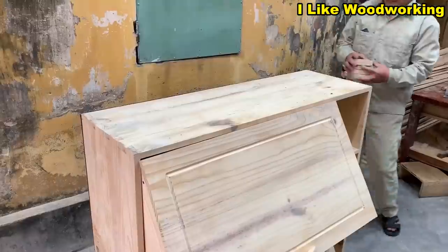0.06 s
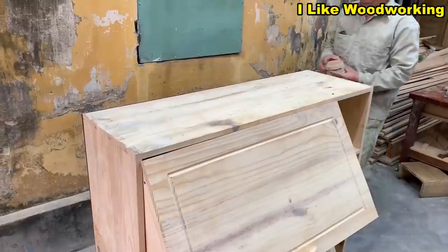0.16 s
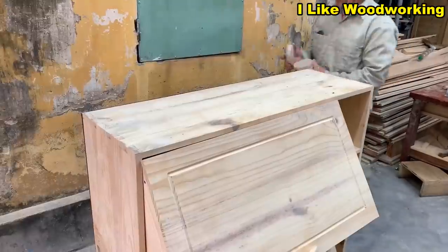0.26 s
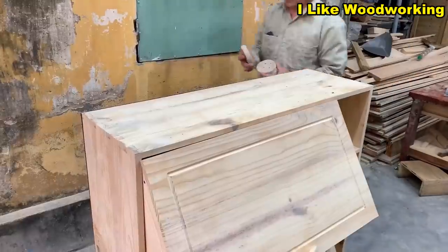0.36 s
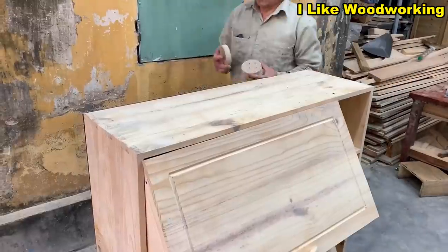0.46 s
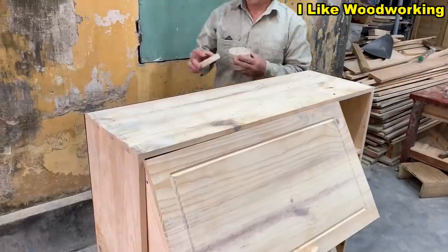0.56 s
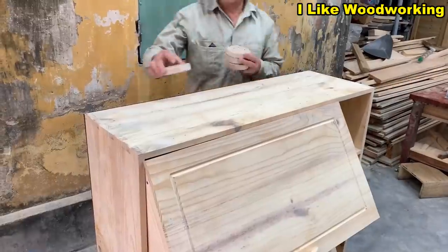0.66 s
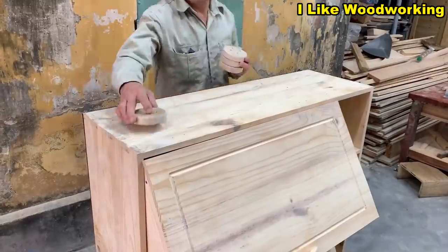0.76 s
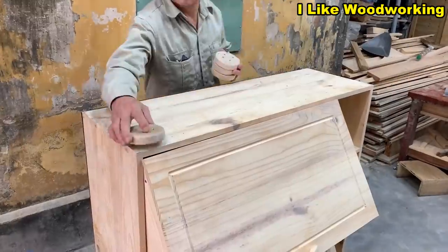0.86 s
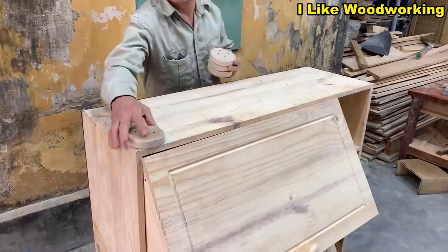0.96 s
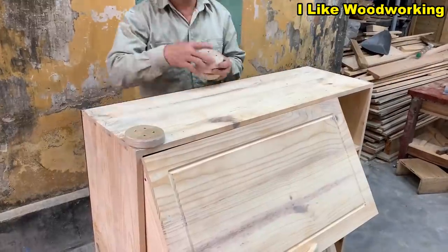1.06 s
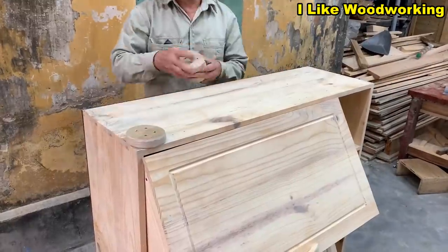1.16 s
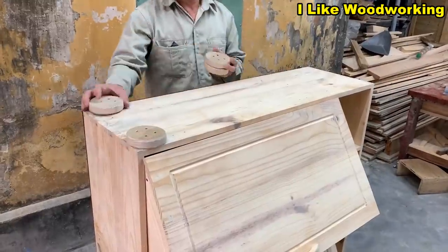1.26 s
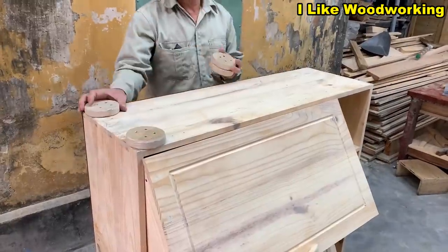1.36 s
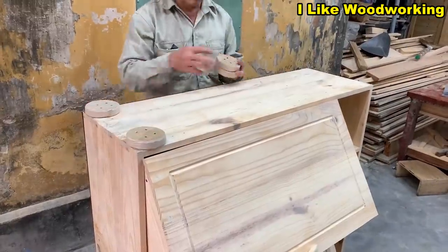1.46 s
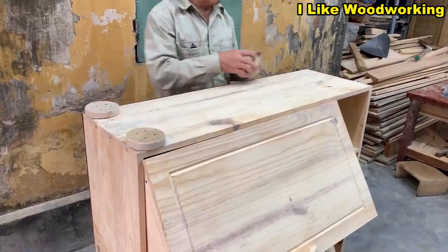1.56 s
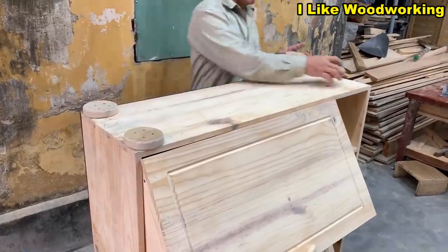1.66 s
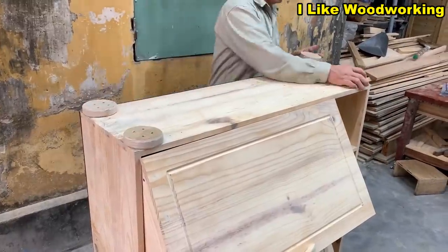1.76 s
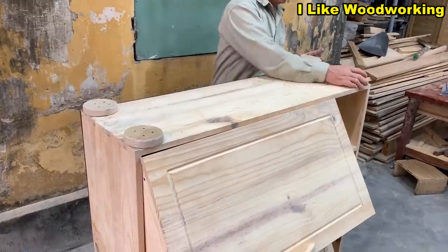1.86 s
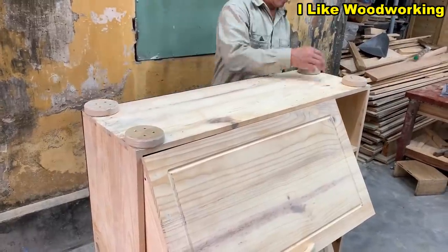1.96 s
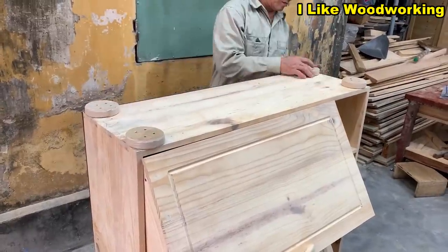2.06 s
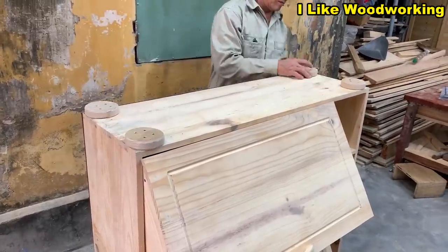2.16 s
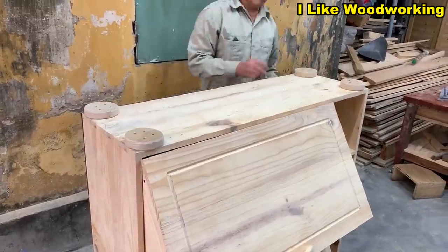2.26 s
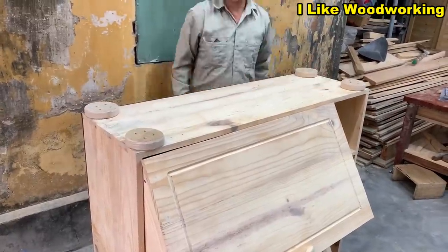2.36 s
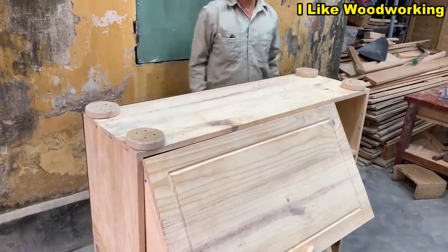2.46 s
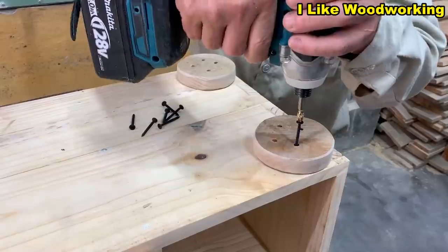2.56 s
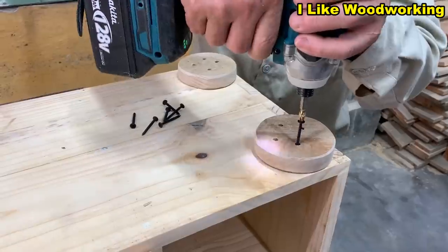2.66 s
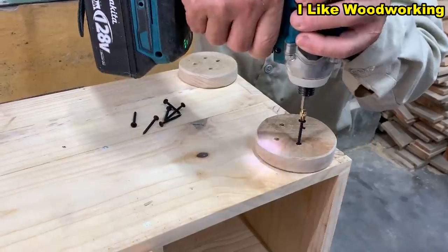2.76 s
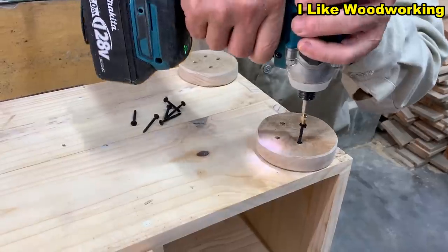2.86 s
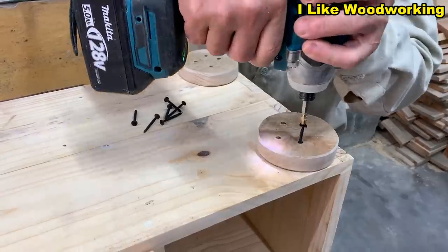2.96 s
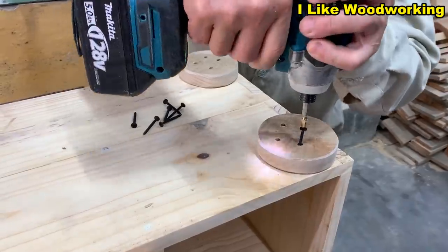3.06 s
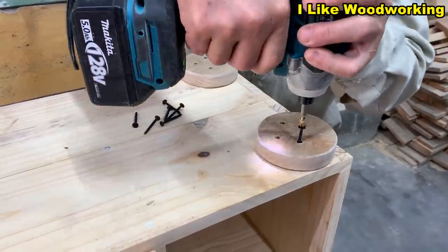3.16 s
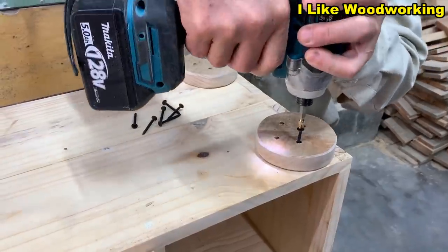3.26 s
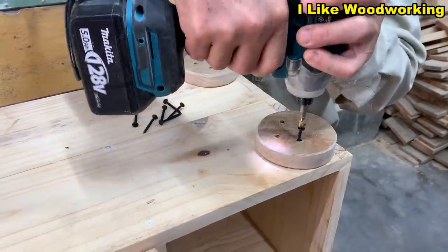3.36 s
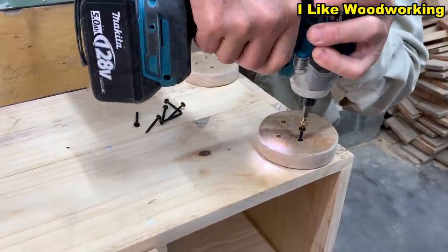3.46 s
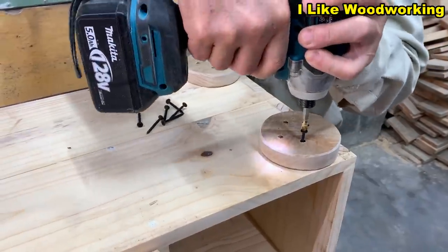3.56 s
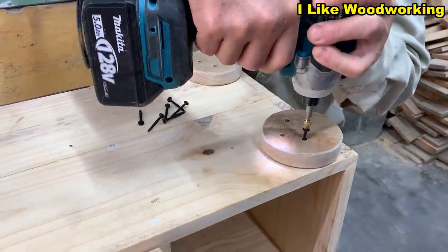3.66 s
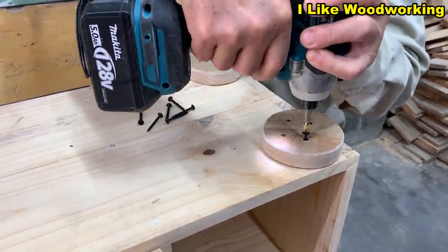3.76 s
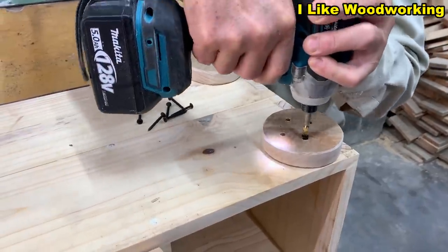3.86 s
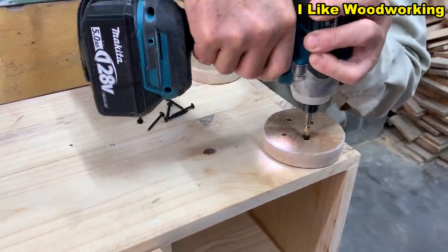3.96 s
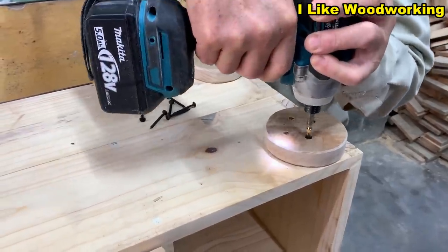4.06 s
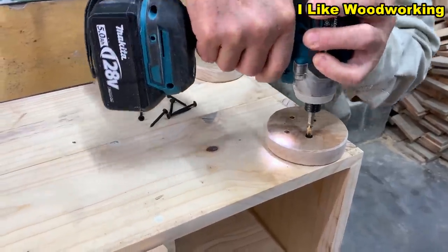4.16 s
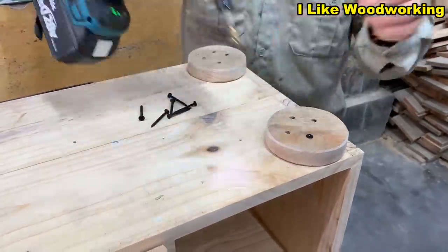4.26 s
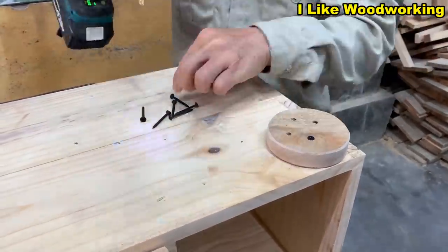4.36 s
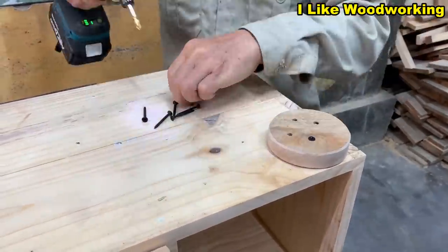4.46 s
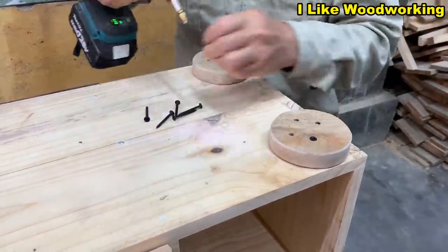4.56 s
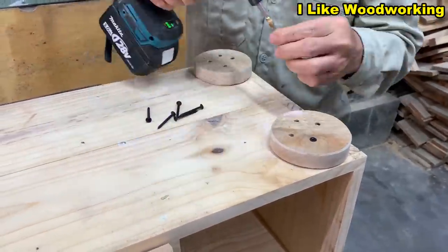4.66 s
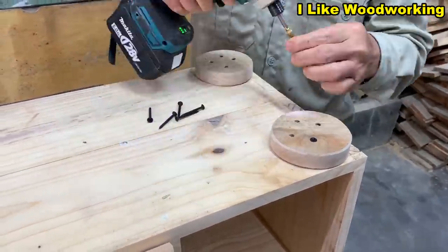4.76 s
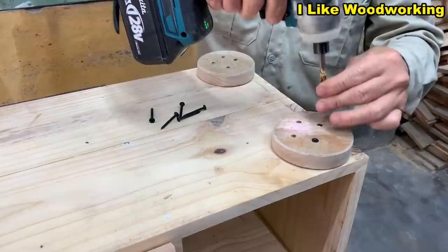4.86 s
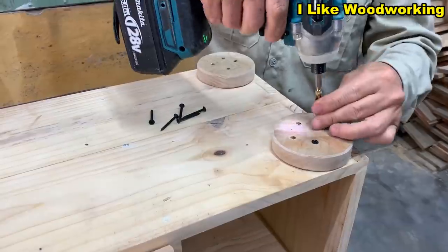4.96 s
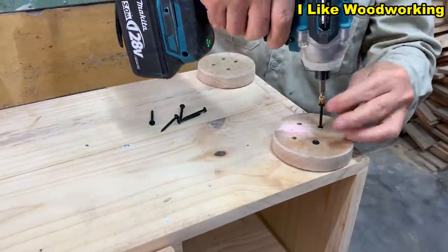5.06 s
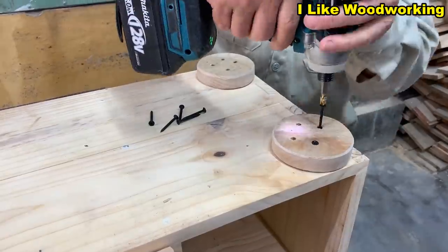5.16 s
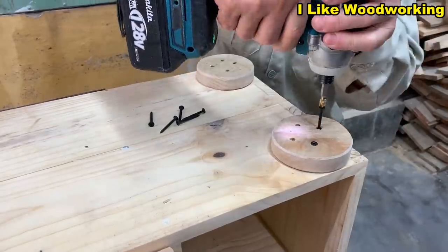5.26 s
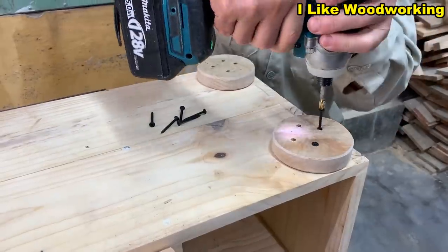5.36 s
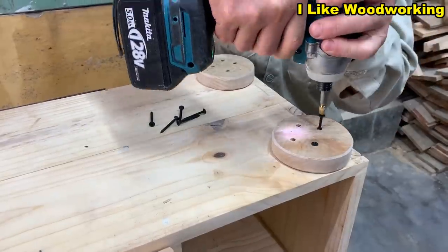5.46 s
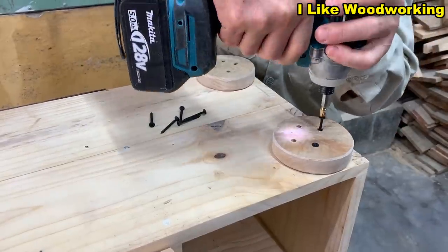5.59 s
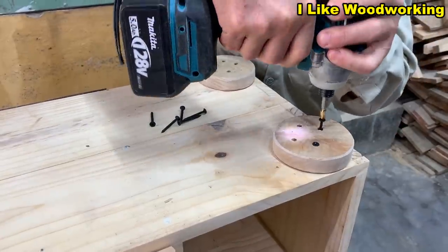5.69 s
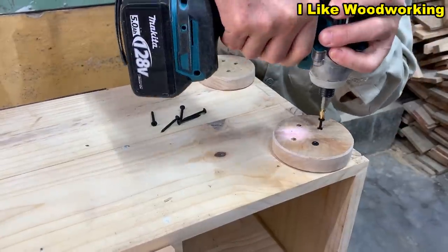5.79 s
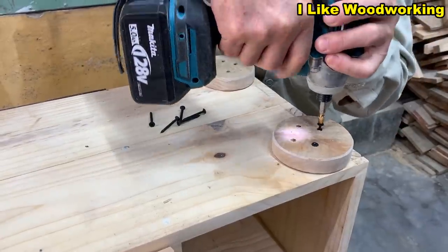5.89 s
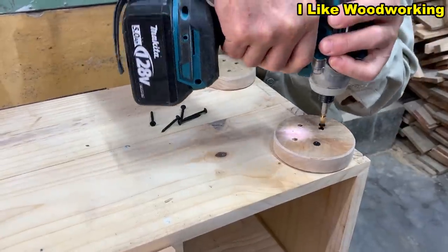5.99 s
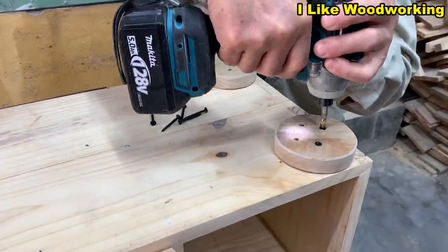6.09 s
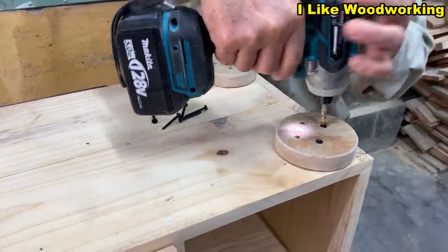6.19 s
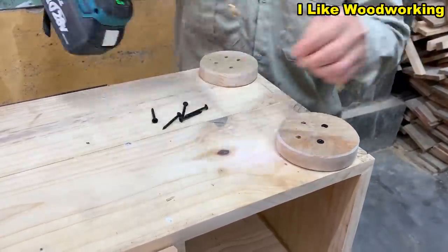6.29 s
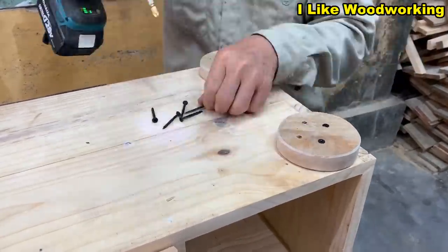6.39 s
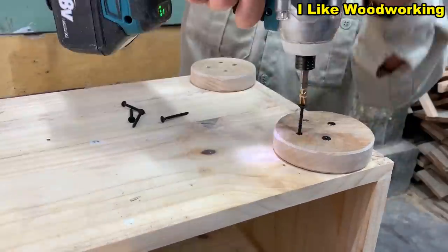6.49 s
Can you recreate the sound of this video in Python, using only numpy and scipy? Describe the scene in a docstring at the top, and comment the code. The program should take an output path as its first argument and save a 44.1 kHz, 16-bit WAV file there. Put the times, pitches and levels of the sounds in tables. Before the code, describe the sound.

A small, fairly dry wood workshop in three hard-cut shots. At 0.01 and 0.10 s, two hollow hammer taps hit a cabinet. From 0.15 to 2.6 s, a machine further off hums unsteadily beneath broad airy hiss; a knock at 0.2, faint clacks around 0.6 and 0.9, a disc landing at 1.0, soft bumps near 1.4 to 1.7, another landing at 1.87 and the sharpest clack at 2.05. After a tiny gap, the close shot opens with a cluster of bumps and rubbing until 2.9. A cordless impact driver then turns slowly and fires nine bursts from 2.97 to 4.27, each under a tenth of a second: whirring motor, rattling steel, ringing wood, occasional short gliding squeals, the final burst heaviest. Quieter handling and light knocks follow. From 5.46 the second screw starts gently; six lighter bursts run 5.55 to 6.3, with a high squeal near 6.13, then small knocks to 6.6.

```python
"""A workshop, heard in three shots: two hammer taps on a cabinet; wooden discs set down on it while a machine
hums; then, close up, a cordless impact driver sinks two screws through a disc in short trigger bursts.
Shop air is coloured noise, the hum is wavering tones, and knocks are bursts of noise that die away.
In each burst the motor swells, uneven blows ring bit, disc and cabinet, and in some the slipping screw
squeals as a gliding stack of harmonics."""
import sys
import numpy as np
from scipy import signal
from scipy.fft import rfft, irfft
from scipy.io import wavfile
from scipy.ndimage import uniform_filter1d

SR = 44100
rng = np.random.default_rng(int(sys.argv[2]) if len(sys.argv) > 2 else 0)


def wav_record(signal):
    """Record a signal, one row per channel, as 16-bit PCM in the file named by sys.argv[1]."""
    frames = np.transpose(np.atleast_2d(signal))
    bounded = np.clip(frames, -1, 1)
    # unit amplitude maps onto the largest positive 16-bit level
    quanta = np.round(bounded * 32767).astype(np.int16)
    wavfile.write(sys.argv[1], SR, quanta)


N = 287973
TIME = np.arange(N) / SR
EDGE_HZ = 16000  # top of the band that is heard


def amp(db):
    """Turns decibels into gain."""
    return 10 ** (np.asarray(db) / 20)


def evened(x):
    """Scales a sound to an rms of one."""
    return x / np.sqrt(np.mean(x ** 2) + 1e-20)


def read(points, hz):
    """Reads a table between its points, along a log-frequency axis."""
    f, value = np.transpose(points)
    return np.interp(np.log(hz + 1), np.log(f + 1), value)


def add(mix, s, sound):
    """Mixes a sound in at time s."""
    part = mix[..., max(round(s * SR), 0):][..., :sound.shape[-1]]
    part += sound[..., :part.shape[-1]]


def wander(length, hz):
    """Random drift around zero, size roughly one, with hz new targets a second."""
    knots = rng.standard_normal(4096)
    return np.interp(np.arange(length) * hz / SR, np.arange(len(knots)), knots)


def colour(x, spectrum, tilt_db=0, size=2048):
    """Causal filter with the given spectrum, tilted around 1 kHz by about tilt_db an octave."""
    hz = abs(np.fft.fftfreq(size, 1 / SR))
    level_db = np.maximum(read(spectrum, hz), -90) + tilt_db * np.log2(hz / 1000 + 1 / 10)
    log_gain = np.log(amp(level_db))
    # minimum phase: the filter answers as early as it can
    taps = np.fft.ifft(np.exp(np.conj(signal.hilbert(log_gain)))).real
    return signal.oaconvolve(x, taps)[:len(x)]


def ring(x, modes):
    """Passes x through damped resonances; neighbours swing in opposite senses."""
    t = np.arange(len(x)) / SR
    body = np.zeros(len(x))
    for k, (hz, width, db) in enumerate(modes):
        fade = width * np.exp(-np.pi * width * t)  # a wide resonance dies sooner
        body += (-1) ** k * amp(db) * fade * np.sin(2 * np.pi * hz * t)
    return signal.fftconvolve(x, body)[:len(x)]


def sized(x, db, seconds):
    """Gives x the energy of a sound that holds db for so many seconds."""
    return amp(db) * x * np.sqrt(seconds * SR / (np.sum(x ** 2) + 1e-20))


def ports(x, lag_ms):
    """Sends one sound to left and right; the right one lags."""
    lead = np.exp(1j * np.pi * np.fft.rfftfreq(N, 1 / SR) * lag_ms / 1000)
    return irfft(rfft(x) * np.array([lead, 1 / lead]), N)


def scatter(x, t60s, size=16384):
    """Dense reflections, unrelated left and right, each band dying at its own speed."""
    hz, t, z = signal.stft(rng.standard_normal((2, size)), SR, nperseg=128)
    decay = amp(-60 * t / read(t60s, hz)[:, None])
    tail = signal.istft(z * decay, SR, nperseg=128)[1]
    return signal.oaconvolve(x[None], tail / np.linalg.norm(tail[0]), axes=1)[:, :N]


# how long the room rings, time to fall by 60 dB: pitch_hz, t60_s
ROOM_RING = [(150, 0.52), (600, 0.07), (2000, 0.27), (6000, 0.26), (15000, 0.093)]
SWAY_HZ = 12  # hands and tool keep shifting the short reflections


def place(x, lag_ms, right_db, near_db, room_db, near_t60=0.026, count=3):
    """Direct sound left and right, quick bright reflections that shift, and the room."""
    bright = signal.lfilter(*signal.butter(2, 1800, "high", fs=SR), x)
    near = np.zeros((2, N))
    for k in range(count):
        sway = np.cos(np.pi * (SWAY_HZ * TIME + k / count))
        near += scatter(bright * sway, [(1, near_t60), (SR, near_t60)], size=4096)
    heard = ports(x, lag_ms) + amp(near_db) * near + amp(room_db) * scatter(x, ROOM_RING)
    return heard * amp([[-right_db / 2], [right_db / 2]])


def air(spectrum, level_db, same, lag_ms=0, right_db=0, shared_below_hz=600):
    """Shop noise; left and right share its bass and a part of the rest."""
    shared, left, right = (evened(colour(rng.standard_normal(N), spectrum)) for _ in range(3))
    hz = np.fft.rfftfreq(N, 1 / SR)
    own = (1 - np.clip(same, 0, 1)) / (1 + (shared_below_hz / (hz + 1)) ** 2)
    common = np.sqrt(1 - own) * rfft(ports(shared, lag_ms))
    separate = np.sqrt(own) * rfft(np.array([left, right]))
    return amp(level_db) * irfft(common + separate, N) * amp([[-right_db / 2], [right_db / 2]])


def hum(lines, waver_hz):
    """Wavering tones of a machine running further off; the upper ones waver more in pitch."""
    out = np.zeros(N)
    for hz, db in lines:
        pitch = hz + waver_hz * np.sqrt(hz / 200) * wander(N, 40)
        flutter = amp(db + 2.2 * wander(N, 12))
        out += np.sqrt(2) * flutter * np.sin(2 * np.pi * np.cumsum(pitch) / SR)
    return out


# colour of the shop air in the first two shots, only the shape counts: pitch_hz, level_db (per Hz)
WIDE_AIR_TONE = [(60, -49), (110, -15.5), (200, -4), (400, -6), (700, -9), (900, -15.5), (1250, -16.5),
                 (1650, -11.5), (2250, -11), (3500, -13), (5000, -10.5), (6200, -11), (9000, -16),
                 (16000, -21.5)]
# tones of the distant machine, before its effort is added: pitch_hz, level_db
WIDE_HUM_TONES = [(204.6, -61), (409.1, -63), (602.9, -59.5), (807.5, -67.5), (1007, -76.5), (1206, -85),
                  (1410, -72.5), (1626, -67.5), (1798, -76.5), (2239, -68.5)]
# effort of the distant machine, which drives its hum and its hiss: time_s, change_db
EFFORT = [(0.09, 4.5), (0.3, -2.5), (0.52, -2), (0.8, 2.5), (1.4, 0), (1.75, 0), (2.2, 1.5), (2.6, 0.5)]
WIDE_AIR_DB = -47.5  # before the effort is added
HUM_PER_EFFORT = 1.9  # dB of hum per dB of hiss


def wide_shop():
    """Air and hum of the first two shots: one changing effort moves both, the hum more strongly."""
    effort_db = np.interp(TIME, *np.transpose(EFFORT))
    machine = hum(WIDE_HUM_TONES, waver_hz=2.31) * amp(HUM_PER_EFFORT * effort_db + 1.5)
    return air(WIDE_AIR_TONE, WIDE_AIR_DB + effort_db, same=0.11, lag_ms=0.413, right_db=0.7) + machine


# colour of the shop air in the close shot, only the shape counts: pitch_hz, level_db (per Hz)
CLOSE_AIR_TONE = [(35, -55), (60, -35), (193, -1), (256, -4), (408, -12), (732, -27), (803, 0),
                  (882, -29.5), (1010, -23), (1090, -32), (2520, -21.5), (3760, -27), (5590, -20.5),
                  (14900, -32), (16000, -44)]
# how loud that air is over time: time_s, level_db
CLOSE_AIR_LEVEL = [(2.9, -45), (4.55, -56), (5.1, -57.5), (6.5, -58.5)]
# machine tones in the close shot: pitch_hz, level_db
CLOSE_HUM_TONES = [(290.7, -73.5), (436.0, -73), (812.9, -59.5)]


def close_shop():
    """Air and hum of the close shot: noise on its own level curve, under a few wavering tones."""
    level_db = np.interp(TIME, *np.transpose(CLOSE_AIR_LEVEL))
    return air(CLOSE_AIR_TONE, level_db, same=0.18) + hum(CLOSE_HUM_TONES, waver_hz=0.89)


# spells of rubbing by sleeves and fingers: start_s, length_s, level_db
RUBBING = [(1.373, .24, -58), (2.672, 0.36, -40), (2.961, 1.49, -42), (4.38, 0.35, -57.5),
           (4.679, 0.13, -56), (4.875, 0.13, -50), (5.13, 0.43, -60.5), (5.43, 1.13, -43.5)]
# colour of rubs and bumps on the cabinet, only the shape counts: pitch_hz, level_db (per Hz)
CABINET_TONE = [(35, -62), (60, -26), (186, -2), (264, 3), (743, -10.5), (815, -13), (1230, -23),
                (1560, -25), (1680, -29), (2470, -37), (2820, -46.5), (5000, -51.5), (6500, -53),
                (11000, -120)]
RUB_FADE_S, NUDGES_PER_S = 0.07, 19  # the nudges fall at random, this many on average


def handling(lumps_db=2.0, nudge_db=2, nudge_s=0.0047):
    """Sleeves and fingers rub unevenly over the cabinet top and nudge it: lumpy coloured noise."""
    level = np.zeros(N)
    for start, length, db in RUBBING:
        from_edge = np.minimum(TIME - start, start + length - TIME)
        level += amp(db) * np.clip(from_edge / RUB_FADE_S, 0, 1)
    strikes = rng.random(N) < NUDGES_PER_S / SR
    nudges = signal.lfilter([1], [1, -np.exp(-1 / (nudge_s * SR))], strikes)
    force = evened(amp(lumps_db * wander(N, 70))) + amp(nudge_db) * evened(nudges)
    return level * evened(colour(force * rng.standard_normal(N), CABINET_TONE, tilt_db=3))


def knocks(rows, tone, crack=2.5, treble_damping=.5, size=12000):
    """A knock on wood: a crack, then dense noise whose treble dies first."""
    out = np.zeros(N)
    for s, db, tilt_db, t60 in rows:
        hz, t, z = signal.stft(rng.standard_normal(size), SR, nperseg=128)
        decay = amp(-60 * t / t60 * (1 + hz[:, None] / 2000) ** treble_damping)
        body = signal.istft(z * decay, SR, nperseg=128)[1]
        body *= 1 + crack * np.exp(-np.arange(len(body)) / SR / 0.00084)
        add(out, s, sized(colour(body, tone, tilt_db), db, 0.022))
    return out


# discs land on the cabinet top; top and disc ring: time_s, pitch_hz, width_hz, level_db
DISC_LANDINGS = [(1.008, 815, 46, -32.5), (1.870, 2230, 85, -38.5), (1.872, 680, 14, -37),
                 (2.048, 2310, 70, -25), (2.050, 675, 52, -39)]


def landings(size=12000):
    """A disc set down rocks for an instant: a short scrap of noise rings one resonance."""
    out, t = np.zeros(N), np.arange(size) / SR
    for s, hz, width, db in DISC_LANDINGS:
        rocking = np.diff(rng.standard_normal(size) * np.exp(-t / 0.015), prepend=0)
        add(out, s, sized(ring(rocking, [(hz, width, 0)]), db, 0.012))
    return out


# knocks on the cabinet: time_s, level_db, tilt_db (per octave)
CABINET_BUMPS = [(0.220, -33.5, 3), (1.365, -44, -6), (1.502, -38, -5), (1.738, -43.5, -4),
                 (2.639, -40.5, 0.5), (2.738, -32, 3), (2.763, -34.5, -2), (2.809, -33, 4.5),
                 (2.838, -30.5, 5.5), (2.885, -28, 1.5), (3.255, -36.5, -3), (4.346, -39.5, 6),
                 (4.618, -38.5, 3.5), (5.006, -48.5, -2.5), (5.176, -44.5, 3), (5.242, -40.5, 0.5),
                 (5.742, -33, 4.5), (6.398, -36.5, 2.5), (6.45, -43, 5.5)]
BUMP_T60_S = 0.18  # for the bass; the treble dies sooner


def bumps():
    """Knocks, landing discs and rubbing, all through the wood of the cabinet."""
    rows = [(*row, BUMP_T60_S) for row in CABINET_BUMPS]
    wood = knocks(rows, CABINET_TONE, crack=2.2, treble_damping=0.91) + landings() + handling()
    return place(wood, lag_ms=0.058, right_db=0, near_db=-11.5, room_db=-24.5)


# wooden clacks: time_s, level_db, tilt_db (per octave), t60_s (of the bass)
WOOD_CLACKS = [(0.575, -43.5, 28, 0.073), (0.900, -53, 22, .08), (0.960, -48, 15, 0.098),
               (1.006, -37.5, 10, 0.16), (1.869, -37, -4, 0.22), (2.047, -24.5, 2, 0.19)]
# colour of the clacks, only the shape counts: pitch_hz, level_db (per Hz)
WOOD_CLACK_TONE = [(180, -41), (300, -38), (412, 4), (537, -54), (678, 3.5), (1280, -32), (1410, -9),
                   (1810, -14), (2320, -1), (4090, -11.5), (6200, -8), (7200, -17), (9880, -23),
                   (10900, -32), (16000, -38)]


def clacks():
    """Wood clacks on wood: knocks with a strong crack."""
    dry_clacks = knocks(WOOD_CLACKS, WOOD_CLACK_TONE, crack=2.0, treble_damping=0.37)
    return place(dry_clacks, lag_ms=0.46, right_db=2.0, near_db=2, room_db=-9.5)


# hammer taps: time_s, level_db, tilt_db (per octave), t60_s (of the bass)
HAMMER_TAPS = [(0.013, -21.5, 1.5, 0.2), (0.102, -20, 3, 0.23)]
# colour of the taps, only the shape counts: pitch_hz, level_db (per Hz)
TAP_TONE = [(59, -57), (100, -32), (202, -2), (621, 3), (818, -7), (1310, -7.5), (1720, -25), (2080, -17.5),
            (2420, -9.5), (2630, -17), (3540, -26), (6020, -26), (10700, -31), (15000, -22), (16000, -43)]


def hammer_taps():
    """A hammer taps the cabinet: knocks with little crack and a long body."""
    dry_taps = knocks(HAMMER_TAPS, TAP_TONE, crack=0.33, treble_damping=0.88)
    return place(dry_taps, lag_ms=0.026, right_db=-0.5, near_db=-12.5, room_db=-40)


# squeals as the screw sticks and slips: start_s, length_s, first_pitch_hz, last_pitch_hz,
# bend (no unit, over 1 settles early), level_db
SCREW_SQUEALS = [(3.116, .021, 3150, 1700, .7, -22), (3.303, .02, 1200, 900, 1, -25),
                 (3.482, .021, 3400, 1500, 1.4, -24.5), (3.806, .011, 1000, 1200, 1, -25),
                 (3.967, .017, 10100, 14400, 1.5, -21), (5.535, .04, 3000, 1750, 1.3, -24),
                 (5.794, .03, 2050, 1800, 1.1, -26), (5.961, .013, 930, 1310, .8, -24),
                 (6.131, .032, 10000, 14450, 3.5, -17.5)]
# colour of the squeals, only the shape counts: pitch_hz, level_db
SQUEAL_TONE = [(900, -2), (1950, 6.5), (2900, -14.5), (4200, -9), (6000, -1.5), (8800, 8), (11500, -6),
               (14500, -6), (16000, -8.5)]


def squealing():
    """0 to 1: how far the screw slides smoothly instead of being hammered."""
    on = sum((TIME > start) & (TIME < start + length) for start, length, *_ in SCREW_SQUEALS)
    return uniform_filter1d(np.minimum(on, 1).astype(float), 200)


def squeals():
    """The thread sticks and slips very fast: an unsteady, gliding stack of harmonics."""
    out = np.zeros(N)
    for start, length, first_hz, last_hz, bend, db in SCREW_SQUEALS:
        t = np.arange(0, length, 1 / SR)
        glide = last_hz + (first_hz - last_hz) * np.maximum(1 - t / length, 0) ** bend
        hz = glide * (1 + .02 * wander(len(t), 300) + .035 * wander(len(t), 3000))
        phase = 2 * np.pi * np.cumsum(hz) / SR
        slips = np.zeros(len(t))
        for k in range(1, 17):
            gain = amp(read(SQUEAL_TONE, k * hz) + 2 * wander(len(t), 230))
            slips += gain * (k * hz < EDGE_HZ) * np.cos(k * phase)
        add(out, start, amp(db) * evened(slips) * signal.windows.tukey(len(t), .2))
    return out


# trigger bursts: bit_bites_s, screw_loads_wood_s, release_s, steel_level_db, wood_level_db
TRIGGER_BURSTS = [(2.966, 2.969, 3.002, -26, -21.5), (3.115, 3.136, 3.180, -24.5, -19.5),
                  (3.290, 3.289, 3.364, -22.5, -21), (3.48, 3.501, 3.537, -23, -19.5),
                  (3.645, 3.644, 3.702, -21.5, -19.5), (3.797, 3.801, 3.860, -23, -19.5),
                  (3.956, 3.958, 4.012, -26.5, -20), (4.101, 4.104, 4.147, -24.5, -17),
                  (4.227, 4.228, 4.270, -24, -13.5), (5.552, 5.577, 5.646, -27, -24.5),
                  (5.779, 5.777, 5.864, -24.5, -23), (5.95, 5.947, 6.026, -24.5, -22),
                  (6.121, 6.121, 6.140, -26.5, -22.5), (6.16, 6.169, 6.185, -32, -25),
                  (6.271, 6.27, 6.303, -25, -18.5)]
# each screw is started with the motor turning slowly, and its place on the top sets how well it
# drives the low resonances: start_s, slow_turn_length_s, slow_turn_level_db, cabinet_bass_db
SCREW_STARTS = [(2.924, .11, -35.5, 4), (5.46, 0.1, -45.5, -8)]
# colour of the motor, only the shape counts: pitch_hz, level_db (per Hz)
MOTOR_TONE = [(880, -57), (1500, -6.5), (2230, -16), (2440, 2), (2880, -6.5), (4040, -9.5), (4500, -4.5),
              (5170, -2.5), (5940, -5.5), (8160, -11.5), (10100, -10.5), (13500, -4), (16000, -15.5)]
# whirr of the gear case: pitch_hz, width_hz, level_db
GEAR_CASE = [(8230, 560, 0)]
# the motor swells before the bit bites and brakes on release
SPIN_UP_S, SPIN_UP_DB, BRAKE_S = 0.014, 12.5, 0.0083
MOTOR_DB = -8.5  # motor below the steel


def motor(gears_db=-2, slow_gears_db=1):
    """Motor and gears whirr up before each burst, and turn slowly while a screw is started."""
    fast, slow = np.zeros((2, N))
    for bite, load, release, steel_db, wood_db in TRIGGER_BURSTS:
        t = np.arange(bite - 2 * SPIN_UP_S, release + 10 * BRAKE_S, 1 / SR)
        swell_db = SPIN_UP_DB * np.minimum((t - bite) / SPIN_UP_S, 0)
        braking = np.exp(-np.maximum(t - release, 0) / BRAKE_S)
        add(fast, t[0], amp(steel_db + MOTOR_DB + swell_db) * braking)
    for start, length, db, bass_db in SCREW_STARTS:
        add(slow, start, amp(db) * signal.windows.tukey(round(length * SR), .3))
    whirr = evened(colour(rng.standard_normal(N), MOTOR_TONE))
    gears = evened(ring(rng.standard_normal(N), GEAR_CASE))
    return fast * evened(whirr + amp(gears_db) * gears) + slow * evened(whirr + amp(slow_gears_db) * gears)


# resonances of the cabinet, broad and narrow: pitch_hz, width_hz, level_db
CABINET_MODES = [(313.6, 28, -10.5), (389.6, 34.5, -1.5), (432.2, 20.8, 0.5), (548, 24, -6.5),
                 (616.9, 12.2, 4), (659.2, 13.3, 7), (696.5, 21, 3), (706, 53, -5), (822, 15.6, 4),
                 (916, 99, -8.5), (1015.5, 17, -5.5)]
BASS_EDGE_HZ = 416


def seated(s, detune=0.0099):
    """Cabinet resonances under the screw driven at time s, each slightly off pitch."""
    bass_db = [row[-1] for row in SCREW_STARTS if row[0] < s][-1]
    modes = []
    for hz, width, db in CABINET_MODES:
        shifted_hz = hz * (1 + detune * rng.standard_normal())
        modes.append((shifted_hz, width, db + bass_db / (1 + (hz / BASS_EDGE_HZ) ** 10)))
    return modes


def chatter(t, per_s, jitter=.3):
    """Uneven blows, with the grinding of the thread dying away after each."""
    turns = np.cumsum(per_s * np.exp(jitter * wander(len(t), 200))) / SR
    strikes = np.diff(np.floor(turns), prepend=-1)  # one at each whole turn
    blows = strikes * amp(3.5 * rng.standard_normal(len(t)))
    return blows + .085 * np.exp(-2 * (turns % 1)) * rng.standard_normal(len(t))


# single late blows and kicks as the motor brakes: time_s, steel_level_db, wood_level_db
LATE_BLOWS = [(3.030, -25.5, -20), (3.203, -45.5, -26.5), (3.393, -34, -28), (3.562, -46, -29),
              (3.712, -45, -26), (3.885, -48, -28), (5.614, -24, -28), (6.322, -51, -30)]
# colour of the steel bit, only the shape counts: pitch_hz, level_db (per Hz)
STEEL_TONE = [(25, -37), (60, -26.5), (140, -16.5), (400, 0), (800, -4.5), (2500, 1), (3700, -5),
              (5200, -0.5), (6500, -0.5), (8000, 0), (9600, 1.5), (10500, -6), (13000, -1), (14700, 0),
              (16000, -14)]
# resonances of the disc under the screw: pitch_hz, width_hz, level_db
DISC_MODES = [(1197, 33, -2), (1312, 97, -7), (1473, 51, 0), (1545, 42, -3), (1705, 42, 4), (1768, 40, 2),
              (2051, 57, 1), (2087, 55, -7), (2227, 150, -3), (2343, 520, -12.5), (3280, 700, -16.5)]
DISC_DB = -4  # disc against the wood level, in the bursts
BLOWS_PER_S, USUAL_LOAD_DB, DOUBLING_DB = 270, -20, 7  # blows come faster as the wood takes more load


def driver(size=16384, sag_db=4, tighten_db=2, slide_db=-10, detune=0.017, late_disc_db=-6):
    """Each burst: blows ring the steel bit, the disc and the cabinet until release."""
    steel, wood, sliding = np.zeros(N), np.zeros(N), np.pad(squealing(), (0, size))
    for bite, load, release, steel_db, wood_db in TRIGGER_BURSTS:
        t = bite + np.arange(size) / SR
        after = np.maximum(t - release, 0)
        progress = np.minimum((t - bite) / (release - bite), 1)
        blows = chatter(t, BLOWS_PER_S * 2 ** ((wood_db - USUAL_LOAD_DB) / DOUBLING_DB))
        # the first blow, which breaks the screw loose, is the hardest
        add(blows, load - bite, 0.13 * rng.standard_normal(size) * np.exp(-(t - bite) / 0.0055))
        # the motor sags under load: the steel rattle fades while the tightening screw drives the wood harder
        rattle = np.clip((t - bite) / 0.0011, 0, 1) * amp(-sag_db * progress) * np.exp(-after / 0.001)
        push = np.clip((t - load) / 0.0005, 0, 1) * amp(tighten_db * progress) * np.exp(-after / 0.006)
        # a sliding screw passes little force to the wood
        slack = amp(slide_db * sliding[round(bite * SR):][:size])
        force = blows * (push + 0.25 * rattle) * slack
        # bit and disc are seated a little differently every time
        bit = [(hz, db + 1.2 * rng.standard_normal()) for hz, db in STEEL_TONE]
        disc = [(hz * (1 + detune * rng.standard_normal()), width, db) for hz, width, db in DISC_MODES]
        add(steel, bite, sized(colour(blows * rattle, bit), steel_db, release - bite))
        add(wood, bite, sized(ring(force, disc), wood_db + DISC_DB, release - load))
        add(wood, bite, sized(ring(force, seated(bite)), wood_db, release - load))
    t = np.arange(size) / SR
    for s, steel_db, wood_db in LATE_BLOWS:
        blow = rng.standard_normal(size) * np.exp(-t / 0.0062)
        add(steel, s, sized(colour(blow, STEEL_TONE), steel_db, 0.007))
        add(wood, s, sized(ring(blow, DISC_MODES), wood_db + late_disc_db, 0.0047))
        add(wood, s, sized(ring(blow, seated(s)), wood_db, 0.017))
    tool = steel + motor() + squeals()
    return (place(tool, lag_ms=.008, right_db=.7, near_db=.5, room_db=-13, near_t60=.016)
            + place(wood, lag_ms=0.018, right_db=0.3, near_db=-8, room_db=-13.0))


# the three shots, in order: start_s, end_s
SHOT_TIMES = [(0, 0.138), (0.146, 2.621), (2.637, 6.6)]


def scene():
    """Three shots joined by hard cuts, with a very short silence at each."""
    first, wide, close = (uniform_filter1d(((TIME >= start) & (TIME < end)).astype(float), size=40)
                          for start, end in SHOT_TIMES)
    background = (first + wide) * wide_shop() + close * close_shop()
    wood_sounds = (wide + close) * (bumps() + clacks())
    return background + wood_sounds + first * hammer_taps() + close * driver()


def record(dry, low_cut_hz=75):
    """The microphone's low cut, soft overload that mostly rounds the highest peaks, then the band limit."""
    thinned = signal.lfilter(*signal.butter(1, low_cut_hz, "high", fs=SR), dry)
    limited = .85 * np.tanh(thinned / .85)
    band = signal.firwin(301, EDGE_HZ, window=("kaiser", 8), fs=SR)
    return signal.oaconvolve(limited, band[None], "same")


dry = scene()
out = record(dry)
wav_record(out)
```